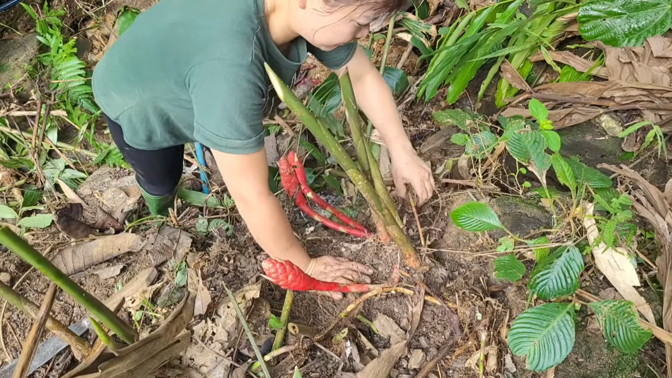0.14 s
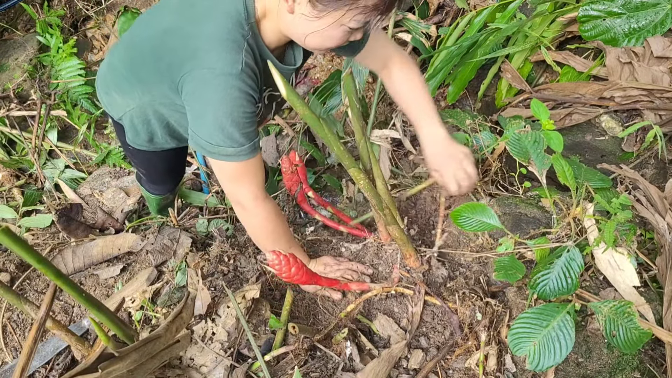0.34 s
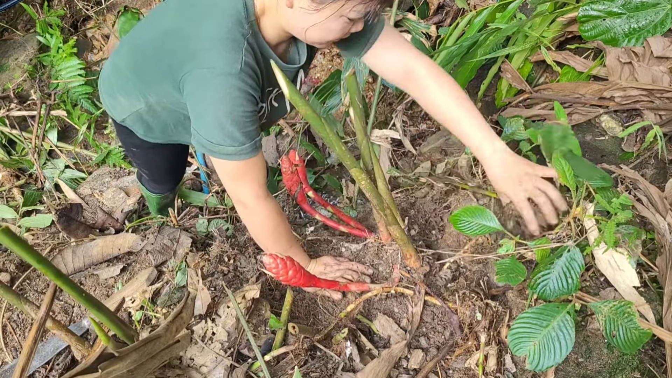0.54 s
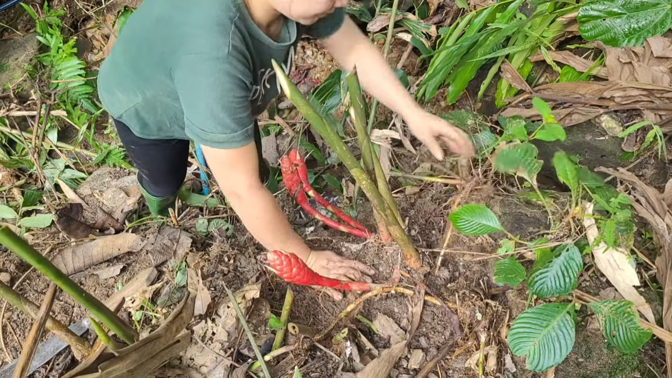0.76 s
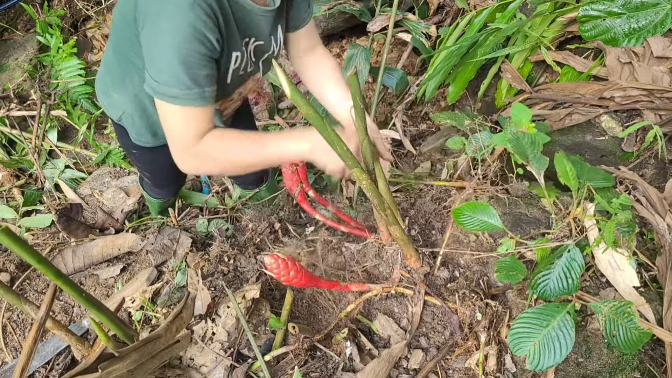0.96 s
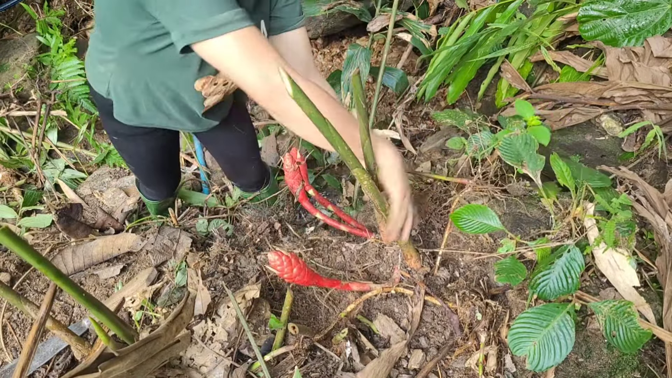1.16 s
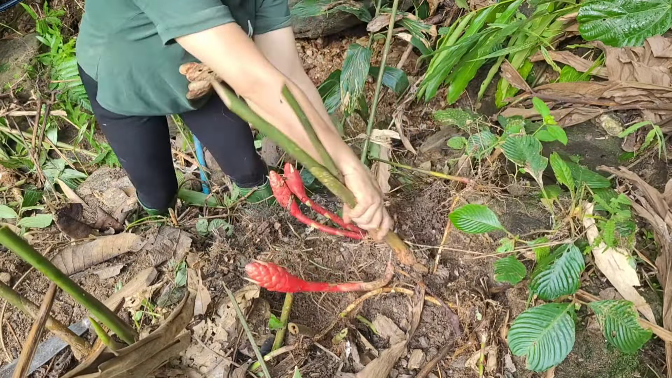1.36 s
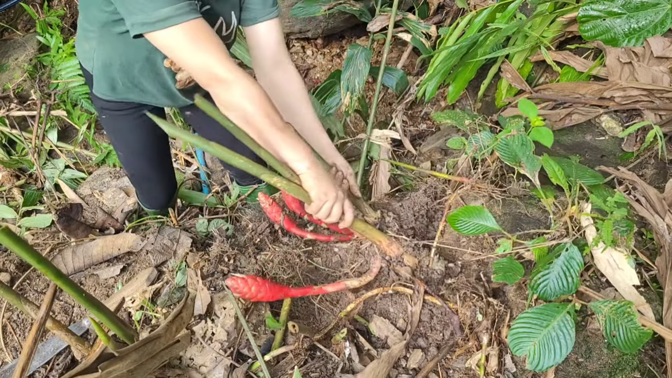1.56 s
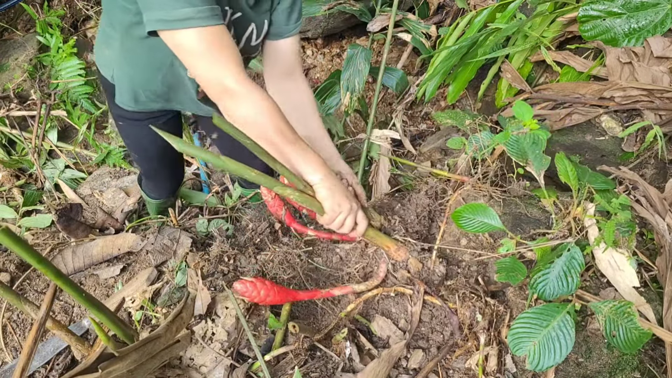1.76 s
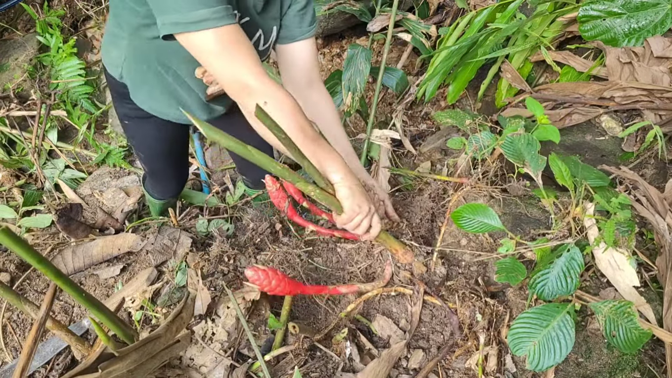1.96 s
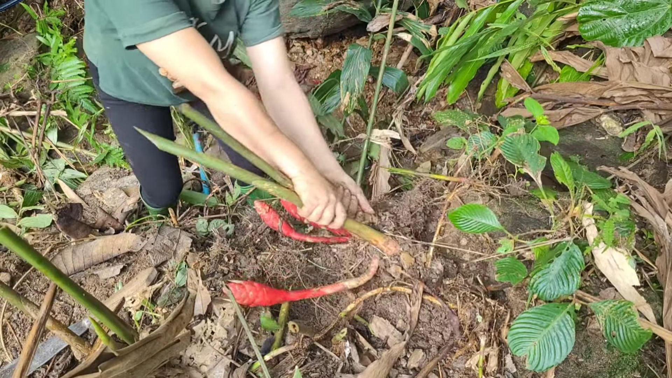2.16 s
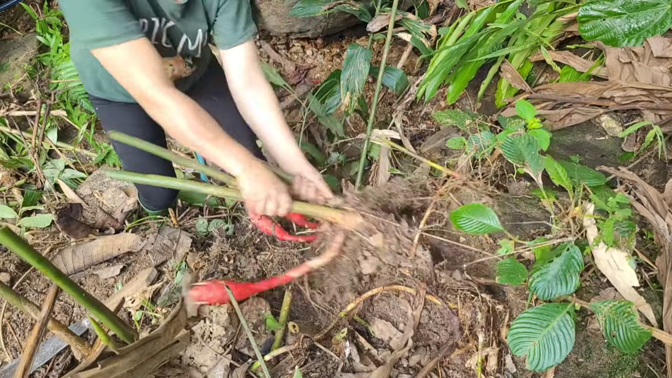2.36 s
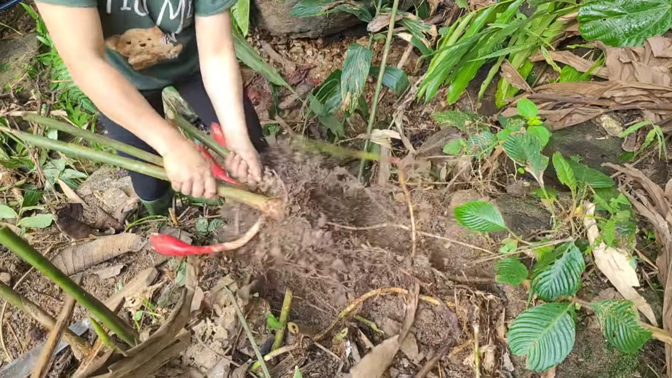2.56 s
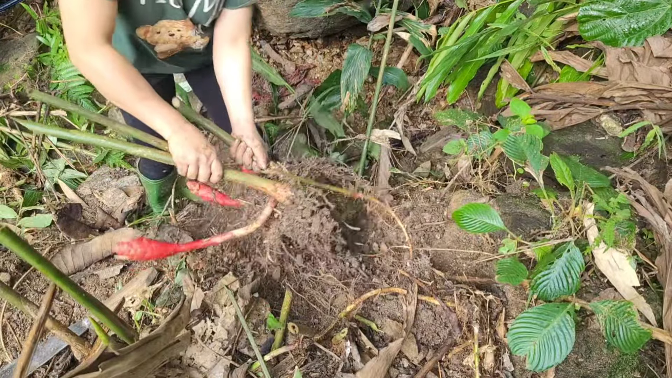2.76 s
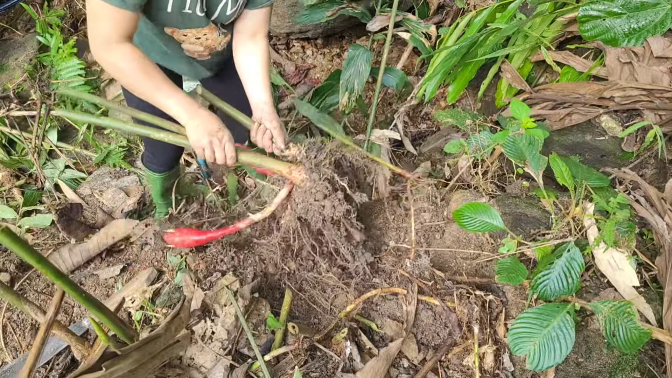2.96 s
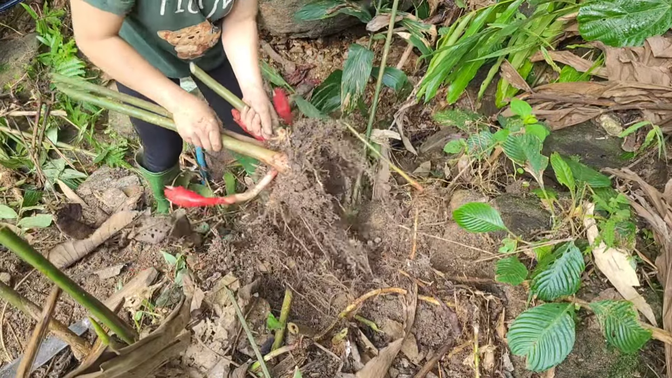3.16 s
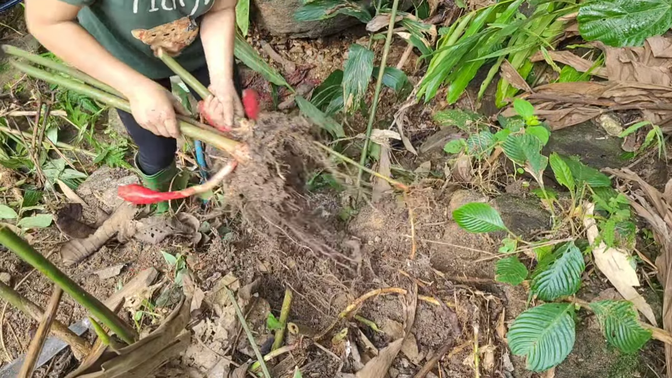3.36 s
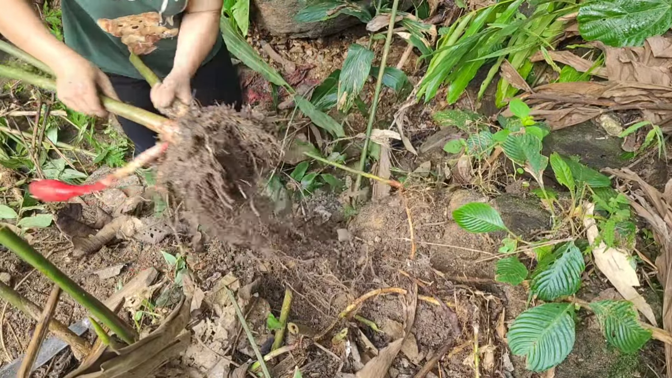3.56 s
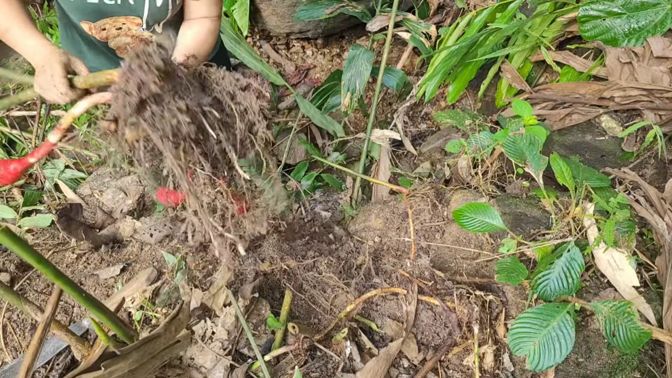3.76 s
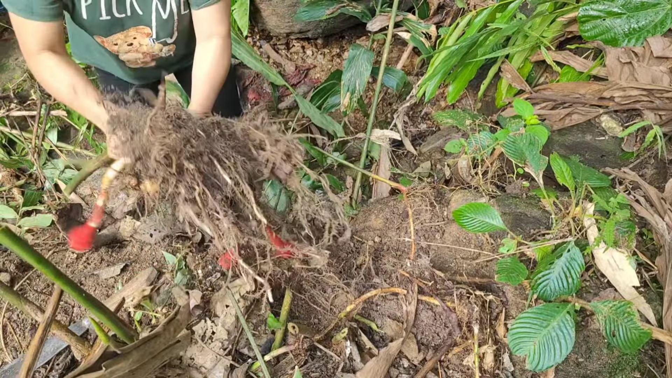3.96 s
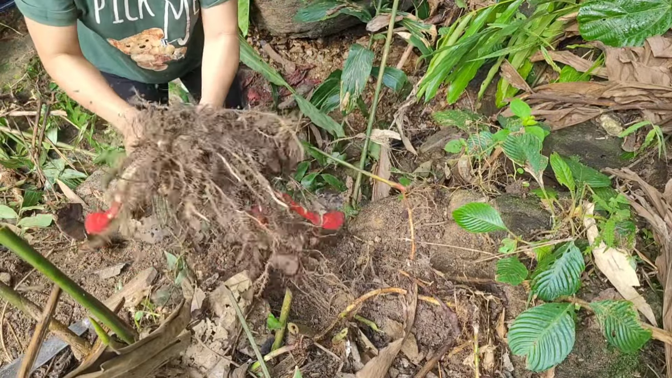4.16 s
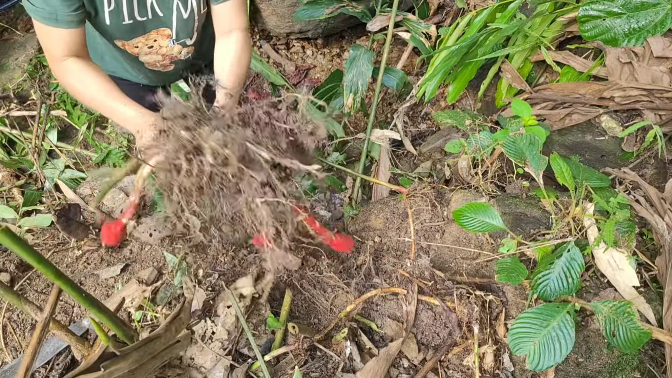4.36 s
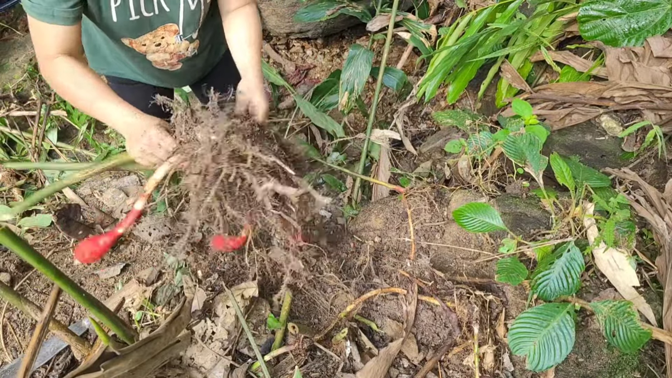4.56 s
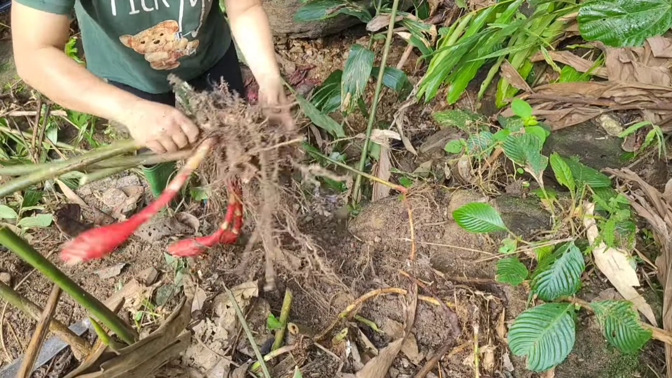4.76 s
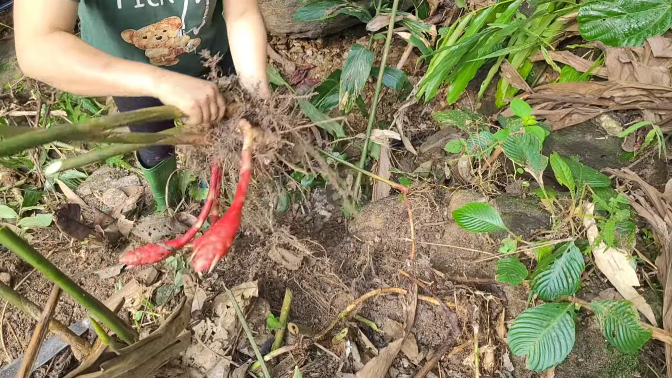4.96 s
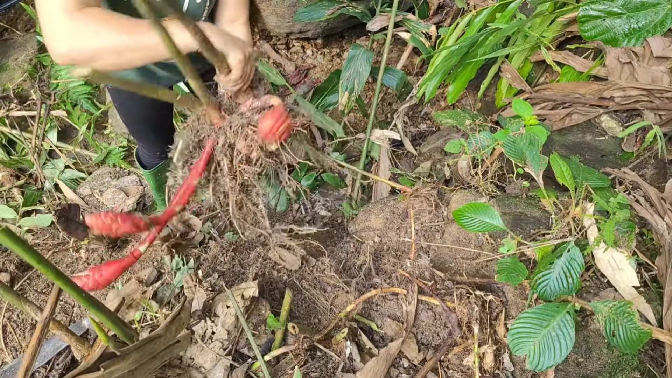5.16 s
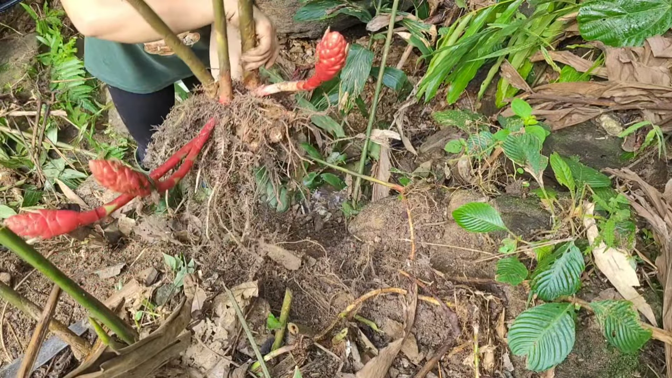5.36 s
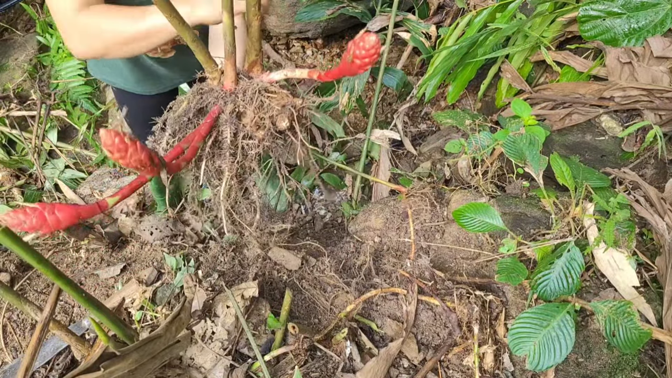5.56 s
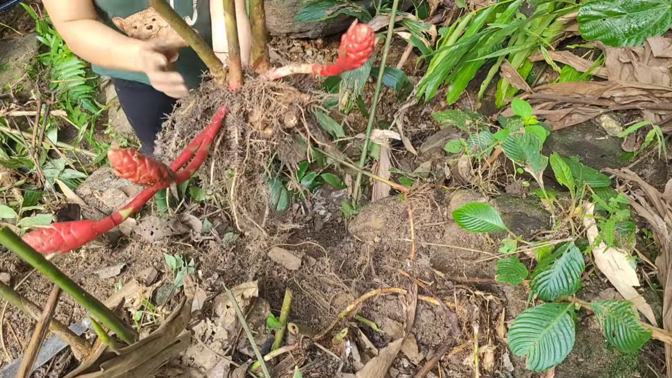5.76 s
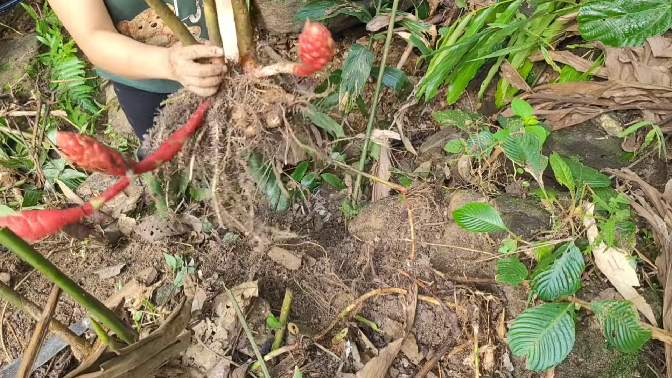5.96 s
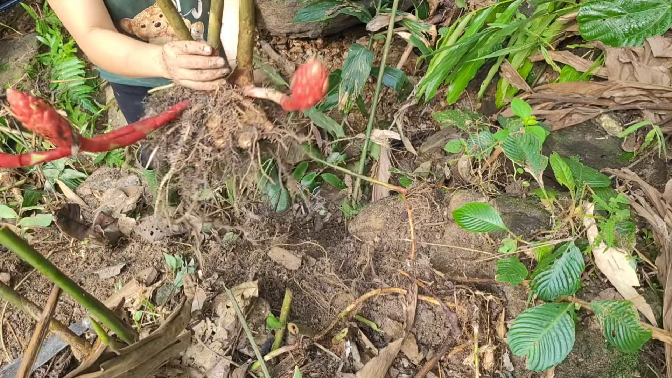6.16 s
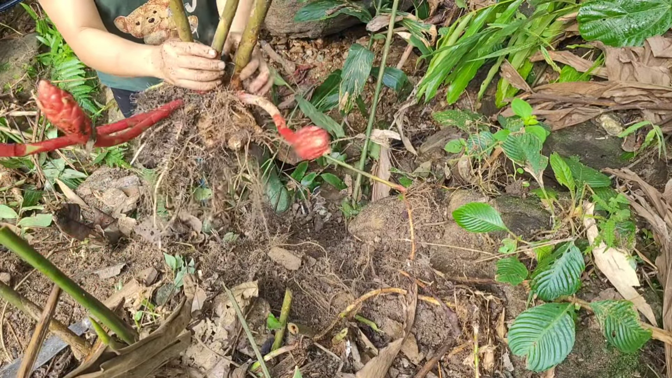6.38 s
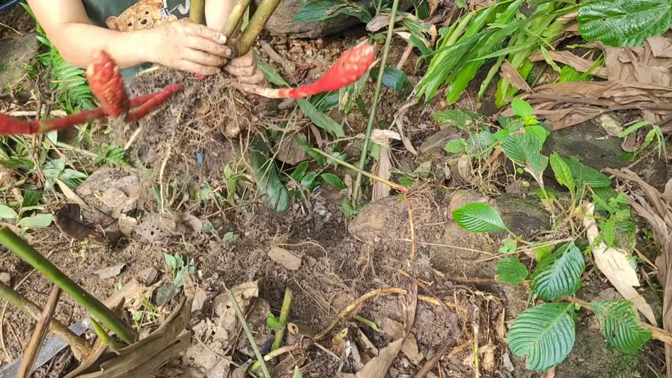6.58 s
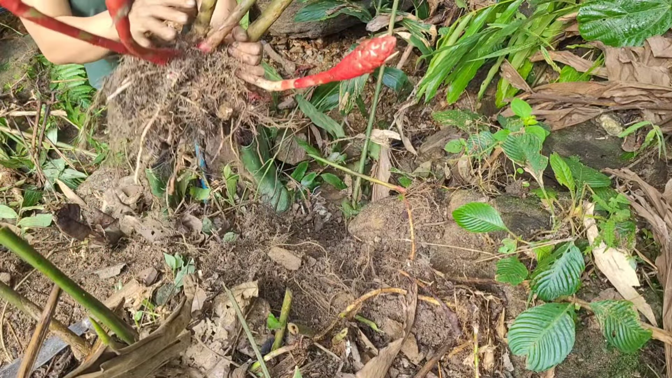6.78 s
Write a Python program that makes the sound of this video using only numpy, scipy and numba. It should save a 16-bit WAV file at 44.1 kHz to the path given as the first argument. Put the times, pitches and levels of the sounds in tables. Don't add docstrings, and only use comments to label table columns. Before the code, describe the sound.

A close, dry outdoor stereo scene on a forest slope, heard from about a metre, with a faint far hiss and high throbbing insects throughout. From 0 to 1.4 s hands rummage in litter: soft grainy rustle, small leaf crackles, dull clod knocks, firmer near 1.2 s. At 1.65 s one bright, hard root crack stands out, then near quiet with a knock at 2.0. From 2.37 to 2.48 s a rapid volley of loud snaps and splintering tears the clump free, with a soft low ground thump. A tiny stem creak comes at 2.8 s. The densest crunching and soil shower runs 2.8-3.2 s, full of sharp ticks, clods and pebbles. Separate shakes follow around 3.4-3.8, 4.2 and 4.4-5.0 s, each a sudden crumbly burst. After 5.2 s it thins to sparse patter, nearly settling by 6.3 s, with a slight last stir near 6.7 s.

```python
import sys
import numpy as np
from scipy import signal
from scipy.fft import rfft, irfft, next_fast_len
from scipy.io import wavfile
from scipy.ndimage import uniform_filter1d
from numba import njit

SR = 44100
rng = np.random.default_rng(int(sys.argv[2]) if len(sys.argv) > 2 else 0)


def unload_wav(signal):
    wavfile.write(
        sys.argv[1],
        SR,
        np.round(np.clip(np.atleast_2d(signal).T, -1, 1) * 32767).astype(np.int16),
    )


def ratio_of_db(decibels):
    return 10 ** (np.asarray(decibels, float) / 20)


N = 300762
T = np.arange(N) / SR

# t/s, peak level/dB, ring f/Hz, debris level/dB
ROOTS = [(1.6454, -15, 4800, -36), (1.6452, -18.5, 3300, -17.5), (1.646, -27, 1700, -20),
         (1.6452, -31.5, 744, -17), (1.6534, -32, 1020, -26), (2.3712, -17.5, 1550, -19),
         (2.3712, -21.5, 4280, -32), (2.3711, -22, 570, -10.5), (2.394, -19.5, 7050, -34),
         (2.3944, -32, 12500, -23), (2.4011, -18, 7140, -21), (2.402, -27, 2040, -20),
         (2.4017, -24, 333, -26), (2.4058, -23, 7100, -8), (2.4085, -17.5, 1720, -16),
         (2.4099, -20.5, 585, -14), (2.41, -13, 4900, -33), (2.414, -21, 2060, -30),
         (2.4182, -19.5, 5000, -27), (2.4268, -25, 13500, -11), (2.4212, -20, 4600, -25),
         (2.437, -32, 1400, -15), (2.448, -30, 9000, -8), (2.4572, -27, 6500, -30),
         (2.4752, -10.5, 5830, -33), (2.475, -21, 12100, -11), (2.476, -15, 2360, -25),
         (2.4760, -18, 1530, -24), (2.475, -35, 338, 0)]
# t/s, peak level/dB, ring f/Hz, debris level/dB
KNOCKS = [(0.079, -50, 775, 3), (0.241, -42, 450, 1), (0.549, -38, 770, -1.5), (0.567, -33, 595, -8.5),
          (0.681, -33.5, 840, -11.5), (0.876, -37, 500, -2.5), (0.966, -38.5, 450, -6.5),
          (0.998, -34, 620, -8), (1.018, -41, 430, -5), (1.155, -32.5, 605, -20), (1.169, -25, 526, -13),
          (1.274, -35.5, 554, -14), (1.319, -36.5, 770, -1.5), (2.029, -25, 610, -18.5),
          (2.64, -36.5, 370, -4), (2.67, -37, 590, -1.5), (2.77, -40.5, 646, 10), (2.922, -29, 1050, -2.5),
          (3.055, -36, 675, -7), (3.148, -24.5, 625, -29), (3.41, -32.5, 610, -8), (3.576, -37, 837, -6),
          (3.822, -33, 725, -13), (3.909, -43, 735, 2), (4.507, -26.5, 627, -20), (4.585, -34.5, 780, -4),
          (4.719, -41, 256, -2.5), (5.062, -34, 676, -23), (5.181, -39.5, 414, -8), (5.618, -43, 428, -7)]
# t/s, peak level/dB, ring f/Hz, debris level/dB
SNAPS = [(0.0712, -43, 1260, 1), (0.1194, -40, 1600, -2), (0.2548, -35, 1620, -6),
         (0.5686, -38, 1290, -6.5), (0.6699, -42, 1290, -1), (0.7976, -30, 1610, -12.5),
         (0.8679, -37, 1200, -14), (0.9517, -34.5, 2050, -10), (1.1578, -34.5, 1550, -11),
         (1.2516, -39.5, 1730, -4), (1.3172, -41.5, 2260, 1.5), (2.2852, -31, 2840, -16),
         (2.6605, -36, 1680, -5), (2.7887, -35.5, 2090, 1), (2.8535, -25, 1750, -20),
         (2.9239, -26, 1450, -1), (3.0027, -24, 2730, -18), (3.0576, -31.5, 1440, 3),
         (3.1499, -21, 2450, -9), (3.4562, -32, 2410, -26), (3.523, -35.5, 1670, -14),
         (3.959, -37, 2050, -4), (4.0328, -26, 1570, -10.5), (4.2035, -37.5, 1730, -5),
         (4.2449, -37, 1660, 2.5), (4.5845, -39.5, 1370, 2.5), (4.6524, -34.5, 2840, -3.5),
         (4.7732, -23.5, 2080, -27), (5.2694, -40, 2350, -3.5), (5.8148, -41, 1860, -19)]
# t/s, peak level/dB, ring f/Hz, debris level/dB
TICKS = [(0.2644, -40, 5500, -5), (0.6704, -32, 5300, -11.5), (0.7996, -38, 5700, 0),
         (0.83, -30, 7350, -17), (1.1413, -37, 5000, -2.5), (1.3169, -34.5, 4630, -6),
         (2.0313, -35, 6430, -9), (2.2852, -31.5, 5600, -16), (2.3421, -35, 4560, -11),
         (2.7403, -31, 5060, -4.5), (2.7572, -34.5, 4650, 5.5), (2.8011, -29.5, 7610, -5),
         (2.852, -22.5, 4870, -22), (2.9358, -27.5, 5650, -1.5), (3.0027, -20.5, 7500, -23),
         (3.076, -22, 7500, -7), (3.1494, -24, 4480, -11), (3.4227, -26.5, 4400, -15),
         (3.6138, -22.5, 7940, -19), (3.8348, -33, 5000, -9), (3.8722, -28, 9000, -17),
         (4.2304, -28.5, 6530, -4), (4.4644, -32, 7600, -1.5), (4.5387, -33, 7300, -11),
         (4.6514, -35, 4560, 0.5), (4.7228, -35, 5450, -0.5), (4.9612, -26, 11100, -18),
         (5.2421, -35, 7450, -6), (5.3294, -37, 7300, -11), (6.6549, -34, 5130, -12)]
# t/s, peak level/dB, ring f/Hz
LUMPS = [(0.009, -44, 385), (0.47, -58, 700), (0.909, -44, 388), (1.085, -41, 1050), (1.214, -40.5, 554),
         (1.514, -44, 760), (2.225, -45, 420), (2.27, -41, 673), (3.253, -38.5, 807), (3.514, -38, 799),
         (3.99, -49, 260), (4.243, -43, 298), (4.323, -43, 748), (4.42, -44, 267), (4.897, -39, 900),
         (5.26, -42, 630), (5.303, -40, 587), (5.657, -42.5, 600), (6.739, -46, 880), (6.779, -52.5, 300)]
# t/s, peak level/dB, ring f/Hz
CRUMBS = [(0.2004, -62, 1570), (0.4843, -41, 1630), (2.3426, -38.5, 1460), (2.5756, -36, 2940),
          (2.7054, -42, 1990), (2.885, -43, 1500), (2.9883, -25.5, 1840), (3.4232, -36, 2130),
          (3.4924, -37.5, 1380), (3.6785, -34.5, 1400), (3.7632, -36, 1520), (3.8227, -41, 1680),
          (4.4672, -38, 1570), (4.6176, -32.5, 1600), (4.6963, -36, 1230), (4.8736, -34, 1790),
          (5.0294, -38, 2650), (5.09, -49, 2500), (5.3387, -37.5, 1650), (5.4933, -42, 1580),
          (5.6594, -39, 2460), (5.765, -40, 1600), (5.979, -44.5, 1830), (6.089, -45, 2570),
          (6.105, -49, 2000), (6.445, -48, 1170), (6.7206, -42, 2270), (6.8087, -41, 1310)]
# t/s, length/s, first slip rate f/Hz, last slip rate f/Hz, level/dB
CREAKS = [
    (2.785, .076, 410, 225, -35),
    (1.39, .12, 452, 448, -65),
]
# t/s, effort as crumb level/dB, share of heavy clods level/dB
STIR = [(0.0, -46.5, -6), (0.16, -53.5, -11), (0.5, -59, -15), (1.12, -57.5, -7), (1.8, -64, -14),
        (2.32, -57.5, -9), (2.72, -49.5, -9.5), (2.8, -43.5, -11), (3.0, -39.5, -10), (3.12, -44.5, -8),
        (3.61, -49.5, -12.5), (4.12, -52.5, -8), (4.41, -46, -11), (4.88, -49.5, -11.5), (5.21, -53, -8),
        (5.431, -56.5, -13), (6.28, -65.5, -20), (6.82, -55, -11)]
# t/s, length/s, effort rise level/dB
SURGES = [(0.2, .15, 4), (0.43, .025, 4), (0.485, .04, 4), (0.82, .03, 3), (1.135, .04, 4), (2.63, .07, 4),
          (2.74, .05, 4), (2.85, .04, 3), (2.92, .055, 5), (3.0, .02, 4), (3.05, .04, 5), (3.133, .035, 6),
          (3.19, .12, 1.5), (3.415, .05, 2), (3.51, .04, 3), (3.575, .065, 4), (3.76, .035, 4),
          (3.82, .05, 2), (3.945, .03, 4), (4.195, .09, 4), (4.4, .09, 2.5), (4.58, .045, 2),
          (4.645, .03, 2.5), (4.72, .025, 3), (4.77, .03, 2), (4.87, .06, 2), (5.04, .04, 3),
          (5.17, .04, 3), (5.24, .04, 3), (5.325, .035, 3), (5.62, .05, 3), (5.75, .04, 2.5),
          (5.96, .03, 3), (6.1, .03, 2), (6.41, .06, 4), (6.66, .02, 2)]
# f/Hz, level/dB per Hz
CLOD = [(59, -46), (100, -33.5), (242, -5.5), (496, -5.5), (598, 0), (965, -5.5), (1200, -2.5), (1560, -30),
        (2640, -120)]
# f/Hz, level/dB per Hz
CRUMB = [(470, -22), (800, 5.5), (972, -42.5), (1070, -8.5), (1400, -0.5), (3320, -4), (4500, -13.5),
         (5850, -11), (9900, -120)]
# f/Hz, level/dB per Hz
LEAF = [(2060, -44), (3500, -2.5), (6320, -6), (7460, -3), (8740, -11), (11200, -6), (14900, -9),
        (16000, -4)]
# t/s, peak level/dB, ring f/Hz
PEBBLES = [(0.044, -40, 821), (0.269, -42, 444), (0.294, -42, 479), (0.354, -46, 1300), (0.429, -42, 1340),
           (0.51, -44, 1650), (1.194, -44, 576), (1.887, -48, 2340), (1.98, -47, 805), (2.634, -39, 614),
           (2.675, -35, 600), (2.884, -30, 2100), (2.936, -26, 1140), (2.944, -25, 1660), (2.952, -28, 608),
           (3.069, -29, 1430), (3.155, -28, 2680), (3.209, -35, 1490), (3.229, -35, 1850),
           (3.279, -36, 1410), (3.304, -39, 853), (3.539, -39, 1910), (3.581, -36, 834), (3.771, -38, 1560),
           (3.849, -42, 353), (4.056, -41, 848), (4.196, -33, 1170), (4.259, -33, 1810), (4.325, -36, 918),
           (4.439, -38, 1360), (4.474, -36, 1550), (4.597, -33, 1610), (4.921, -34, 1070),
           (5.011, -40, 2080), (5.074, -44, 837), (5.199, -45, 447), (5.349, -43, 1670), (5.419, -44, 2420),
           (5.456, -45, 1570), (5.634, -48, 436), (5.849, -51, 861), (5.964, -48, 1890), (6.012, -50, 1180),
           (6.064, -50, 2320), (6.232, -51, 1040), (6.269, -53, 2880), (6.414, -52, 2230),
           (6.457, -48, 1630), (6.508, -47, 1800), (6.634, -50, 1150), (6.666, -43, 2190),
           (6.758, -45, 1160)]
# t/s, peak level/dB, ring f/Hz
FLECKS = [(0.5447, -44, 7070), (0.9138, -39, 7450), (1.1493, -37, 5440), (2.0522, -38, 7170),
          (2.2852, -33, 5630), (2.3186, -38, 7840), (2.6354, -38, 4520), (2.9118, -30, 7790),
          (3.0714, -25, 7760), (3.582, -33, 4900), (4.1979, -35, 4960), (4.2303, -29, 6730),
          (4.4643, -28, 11000), (4.7227, -32, 5370), (5.876, -43, 4970), (5.9234, -40, 7520),
          (6.1454, -42, 7250), (6.3904, -40, 7850), (6.6682, -36, 7190), (6.8004, -41, 4610)]
# t/s, level/dB
THUDS = [
    (0.23, -66),
    (0.55, -70),
    (1.3, -65),
    (1.65, -66),
    (2.75, -65),
    (4.03, -72),
    (4.23, -64),
    (4.68, -64),
]
# f/Hz, level/dB per Hz
FOREST = [(18, -45), (30, -33), (157, -13), (364, -54), (461, -23), (1160, -7), (1630, -11), (2010, -12.5),
          (2410, 0), (5590, -2), (6380, -9), (7270, 3.5), (9220, -5), (14800, -20.5), (16000, -53)]
# centre f/Hz, width f/Hz, level/dB
INSECTS = [
    (7300, 890, -64.5),
    (5500, 1200, -64),
]
# f/Hz, left minus right level/dB
PORT_TILT = [(300, -0.6), (4000, -0.8), (7000, -2), (15000, 3.8)]

DULL = KNOCKS + [row + (-12,) for row in LUMPS]
CRISP = SNAPS + [row + (-10,) for row in CRUMBS]


def level(x, db):
    return x * ratio_of_db(db) / np.sqrt(np.mean(x ** 2))


def on_log(hz, table):
    points_hz, values = np.transpose(table)
    return np.interp(np.log(hz), np.log(points_hz), values)


def colour(x, db_of):
    size = next_fast_len(N)
    hz = np.maximum(np.arange(size // 2 + 1) * SR / size, 1)
    return irfft(rfft(x, size) * ratio_of_db(db_of(hz)), size)[..., :N]


def walk(rate):
    k = int(SR / rate)
    held = np.repeat(rng.standard_normal(N // k + 1), k)
    return 1.62 * uniform_filter1d(uniform_filter1d(held, k), k)[:N]


@njit
def ring(start, lag, hz, cycles, size, rise):
    out = np.zeros((2, N))
    for g in range(len(hz)):
        slow = 2j * np.pi * hz[g] / SR - hz[g] / (cycles[g] * SR)
        fast = slow - hz[g] / (rise * SR)
        step, quick = np.exp(slow), np.exp(fast)
        length = int(6 * cycles[g] * SR / hz[g]) + 2
        for c in range(2):
            at = max(start[g] + (c - .5) * lag[g], 0.)
            first = int(at) + 1
            z = size[g] * np.exp(slow * (first - at))
            w = size[g] * np.exp(fast * (first - at))
            for i in range(first, min(first + length, N)):
                out[c, i] += (z - w).imag
                z, w = z * step, w * quick
    return out


def grains(s, hz, cycles, size, place, rise=.4):
    port_lag_s, port_spread_s = .0001, .00013
    lag = (port_lag_s + port_spread_s * place) * SR + 0 * s
    hz = np.clip(hz, 30, .45 * SR)
    cycles = np.clip(cycles + 0 * s, .2, 9)
    return ring(s * SR, lag, hz, cycles, size, max(rise, .05))


def roots():
    s, db, hz, _ = np.transpose(ROOTS)
    return grains(s, hz, 1.26, ratio_of_db(db + 3.5), -0.81, rise=0.26)


def breaks(events, cycles, spread, splinter_db, count, late_s, lift=0.):
    s, db, hz = np.transpose(events)[:3, :, None]
    u = rng.standard_normal((len(events), count, 3))
    place = np.repeat(0.7 * rng.standard_normal(len(events)) - .6, count)
    lump = np.arange(count) == 0
    pitch = hz * np.exp(np.where(lump, 0, spread * u[..., 0] + lift))
    size = ratio_of_db(db + np.where(lump, 4.0, splinter_db)) * np.where(lump, 1, u[..., 1])
    start = s + late_s + np.where(lump, 0, 0.00092 * np.abs(u[..., 2]))
    return grains(start.ravel(), pitch.ravel(), cycles, size.ravel(), place, rise=0.46)


def creaks():
    edge_s, jerk_s, sag_s = .008, .0225, .0032
    jerk_peak_db, load_db = 9.5, -8
    grip_hz_per_s = 500
    out = np.zeros((2, N))
    for s, length, from_hz, to_hz, db in CREAKS:
        age = np.maximum(T - s, 0)
        slipped = .5 + .5 * np.tanh((age - jerk_s - sag_s) / (2 * sag_s))
        loading_db = load_db * (1 - slipped)
        regrip_hz = grip_hz_per_s * np.clip(age - .045, 0, .03) * (to_hz < 300)
        slip_hz = from_hz + (to_hz - from_hz) * slipped + regrip_hz
        phase = 2 * np.pi * np.cumsum(slip_hz * (1 + .06 * walk(150))) / SR
        shape = np.clip(np.minimum(age, length - age) / edge_s, 0, 1)
        jerk_db = (jerk_peak_db - loading_db) * np.exp(-((age - jerk_s) / sag_s) ** 2 / 2)
        gain = ratio_of_db(db + loading_db + jerk_db - 1.5 + 1.5 * walk(70))
        out += shape * gain * (np.sin(phase) + 0.4 * slipped * np.sin(2 * phase + 1))
    return out


def surges(t):
    rise_s, fall_s = .004, .012
    extra_db = 0
    for s, length, db in SURGES:
        swell = np.minimum((t - s) / rise_s, 1 + (s + length - t) / fall_s)
        extra_db = extra_db + db * np.clip(swell, 0, 1)
    return .6 * extra_db


def stir():
    s, effort_db, clod_db = np.transpose(STIR)
    effort = np.interp(T, s, effort_db) + surges(T)
    heavy = np.interp(T, s, clod_db)
    leaf = effort - 2 - .3 * heavy
    return ratio_of_db([effort + heavy, effort, leaf]) ** 2


def debris(events, rise_s, t60):
    power = np.zeros(N)
    for s, db, _, extra_db, *_ in events:
        span = slice(int(s * SR), int((s + .4) * SR))
        age = np.maximum(T[span] - s, 0)
        power[span] += (1 - np.exp(-age / rise_s)) * ratio_of_db(db + extra_db - 60 * age / t60) ** 2
    return power


def rubble(spectrum, lo_hz, hi_hz, cycles, scatter_db, count):
    u = rng.random((count, 4)).T
    hz = lo_hz * (hi_hz / lo_hz) ** u[1]
    hardness = 4.24 ** (2 * u[3] - 1)
    scatter = scatter_db * np.minimum(-np.log(1 - u[2]), 5.5)
    size = hz / np.sqrt(hardness) * ratio_of_db(on_log(hz, spectrum) + scatter)
    place = rng.standard_normal(count)
    return level(grains(u[0] * N / SR, hz, cycles * hardness, size, place, rise=0.21), 0)


def litter():
    clod, crumb, leaf = stir()
    thick = [r for r in ROOTS if r[2] <= 900]
    medium = [r for r in ROOTS if 900 < r[2] <= 3700]
    thin = [r for r in ROOTS if r[2] > 3700]
    low = debris(DULL + thick, 0.042, 0.14)
    mid = debris(CRISP + medium, 0.0084, .11)
    high = debris(TICKS + thin, 0.0078, 0.12)
    flicker, crackle = walk(30), walk(140)
    clod = clod * ratio_of_db(.6 * flicker + 1.5 * walk(25.12)) + low + 0.033 * mid
    crumb = crumb * ratio_of_db(.2 * flicker + 1.4 * crackle - 3) + mid + .12 * low + 0.044 * high
    leaf = leaf * ratio_of_db(.3 * flicker + 1.2 * crackle + 1.3) + high + 0.24 * mid
    out = np.sqrt(clod) * rubble(CLOD, 111.4, 1137, 2.3, 1.54, count=6500)
    out += np.sqrt(crumb) * rubble(CRUMB, 796.4, 4530, 3.3, 1.9, count=27000)
    return out + np.sqrt(leaf) * rubble(LEAF, 3750, 15740, 1.67, 0.9, count=80000)


def patter(count):
    above_rain_db, scatter_db, centre_hz = 2, 2.6, 2260
    u = rng.random((count, 3)).T
    s = u[0] * (N / SR - .01)
    effort_db = np.interp(s, *np.transpose(STIR)[:2]) + surges(s)
    db = effort_db + above_rain_db + scatter_db * np.minimum(-np.log(1 - u[1]), 3)
    events = np.transpose([s, db, centre_hz * 2.12 ** (2 * u[2] - 1)])
    return breaks(events, 1.15, 0.396, -1.5, count=5, late_s=0., lift=0.65)


def pebbles():
    rings = ratio_of_db(-6) * breaks(PEBBLES, 3.2, .4, -12, count=2, late_s=.001, lift=.5)
    return rings + breaks(FLECKS, 1.4, .4, -3, count=4, late_s=.0006, lift=.15)


def ground():
    tear_s, tear_db = 2.38, -43
    thump_rise_s, thump_t60_s = .03, .34
    knock_db, shuffle_db, rest_db = -36, -23, -88
    soil = rng.standard_normal((2, N)) * 0.45 + rng.standard_normal(N)
    rumble = colour(soil, lambda hz: -7 * np.log2(hz / 68) ** 2)
    power = debris([(tear_s, tear_db, 0, 0)], .039, .31)
    power += stir()[0] * ratio_of_db(shuffle_db) ** 2 + ratio_of_db(rest_db) ** 2
    power += debris([(s, db, 0, 0) for s, db in THUDS], thump_rise_s, thump_t60_s)
    power += debris(DULL, thump_rise_s, thump_t60_s) * ratio_of_db(knock_db) ** 2
    boom = grains(np.array([tear_s + .03]), [59.7], 3.5, ratio_of_db([-50]), 0., rise=1.5)
    return (level(rumble, 0) * np.sqrt(power) + boom) * ratio_of_db(np.array([[-1.3], [1.3]]))


def forest():
    mid, side = colour(rng.standard_normal((2, N)), lambda hz: on_log(hz, FOREST))
    side = colour(side, lambda hz: np.clip(7 * np.log2(hz / 2000), -16, 0))
    swell = ratio_of_db(.25 * walk(4))
    out = level(np.array([mid + side, mid - side]), -56.5) * swell
    for centre_hz, width_hz, db in INSECTS:
        def band(hz):
            return np.maximum(-6 * (2 * (hz - centre_hz) / width_hz) ** 2, -90)
        choir = colour(rng.standard_normal((2, N)), band)
        out += level(choir, db) * ratio_of_db(1.0 * walk(2.16) + 1.6 * walk(40))
    return out


def scene():
    near = roots() + creaks()
    near += breaks(DULL, 0.96, 0.43, -9.0, count=3, late_s=0.00226, lift=0.68)
    near += breaks(CRISP, 1.3, 0.435, -3, count=4, late_s=0.000982)
    near += breaks(TICKS, 2.47, 0.33, -8, count=6, late_s=0.000788)
    age = np.arange(2600) / SR
    echo = rng.standard_normal((2, 2600)) * ratio_of_db(-33.0 - 60 * age / 0.076) * (age > .0012)
    near = near + signal.fftconvolve(near, echo, axes=1)[:, :N]
    near = near + litter() + patter(count=900)
    near = signal.sosfilt(signal.butter(3, 138, "high", fs=SR, output="sos"), near)
    return near + pebbles() + ground() + forest()


def roll_off(x):
    return signal.sosfilt(signal.butter(12, 16650, fs=SR, output="sos"), x)


def record(dry):
    def port_db(hz, side):
        return side * on_log(hz, PORT_TILT) - 70 * np.clip((hz - 15700) / 350, 0, 1)
    left = colour(dry[0], lambda hz: port_db(hz, .5))
    right = colour(dry[1], lambda hz: port_db(hz, -.5))
    return roll_off(np.array([left, right]))


dry = scene()
out = record(dry)
unload_wav(out)
```